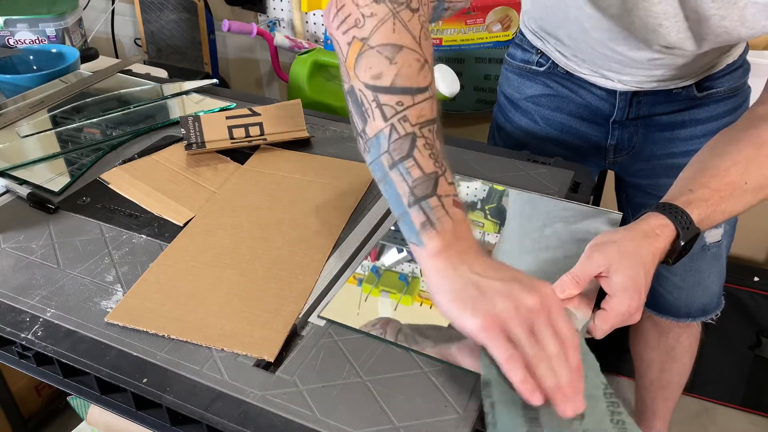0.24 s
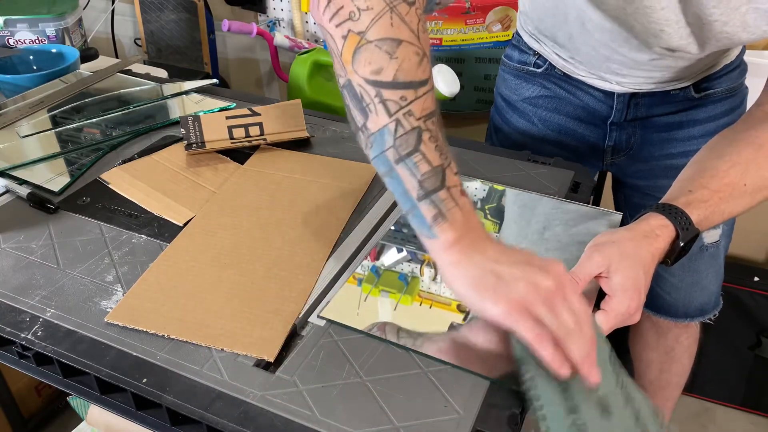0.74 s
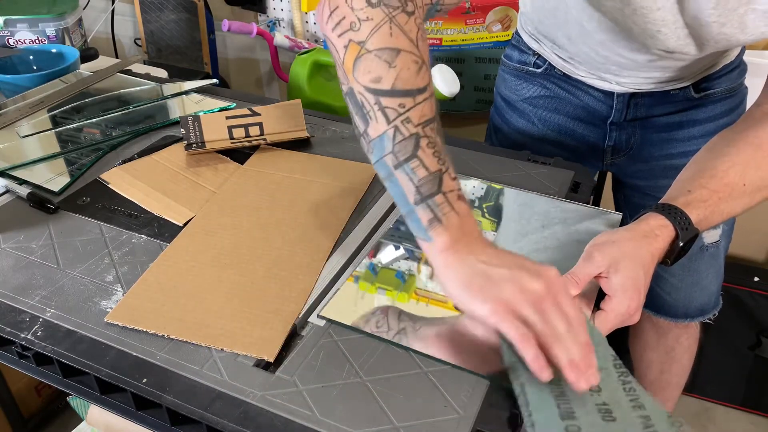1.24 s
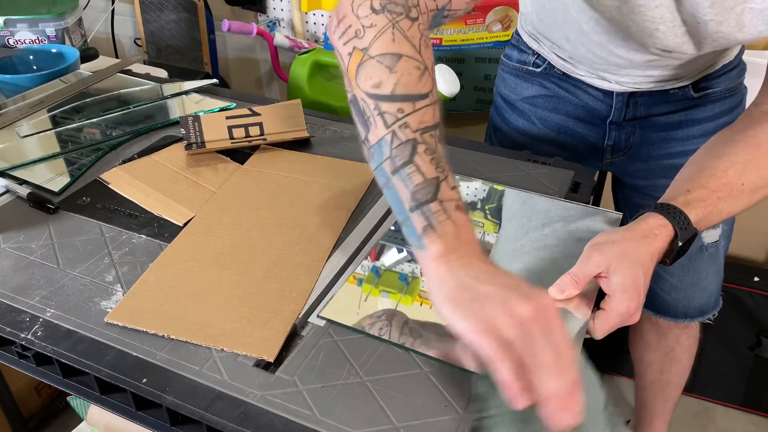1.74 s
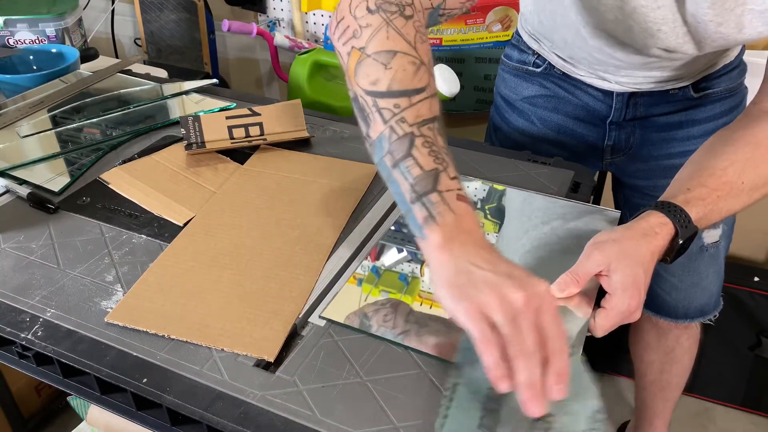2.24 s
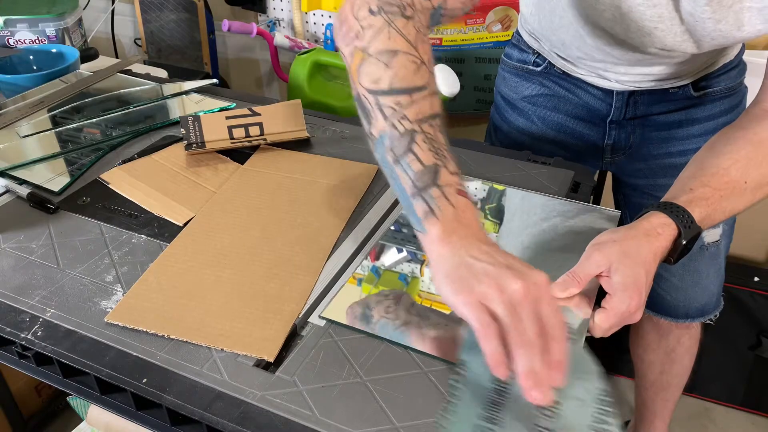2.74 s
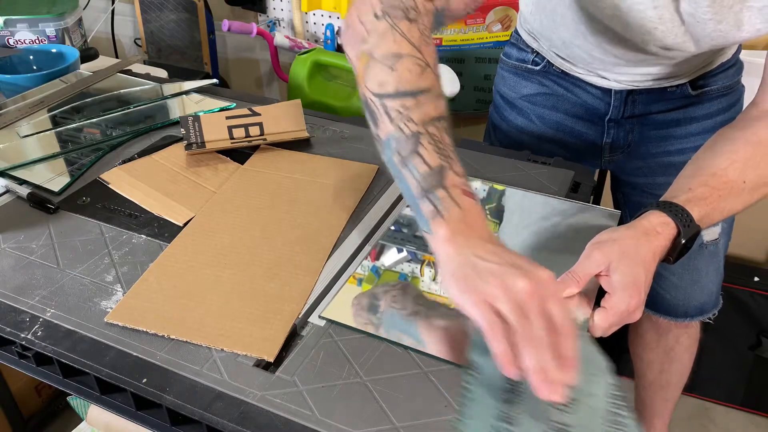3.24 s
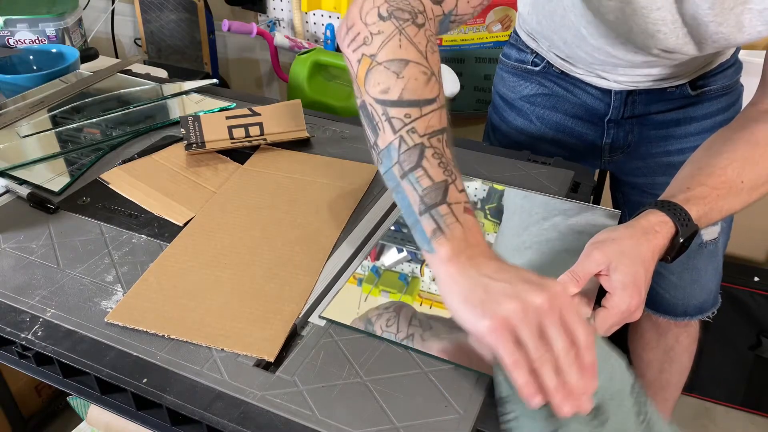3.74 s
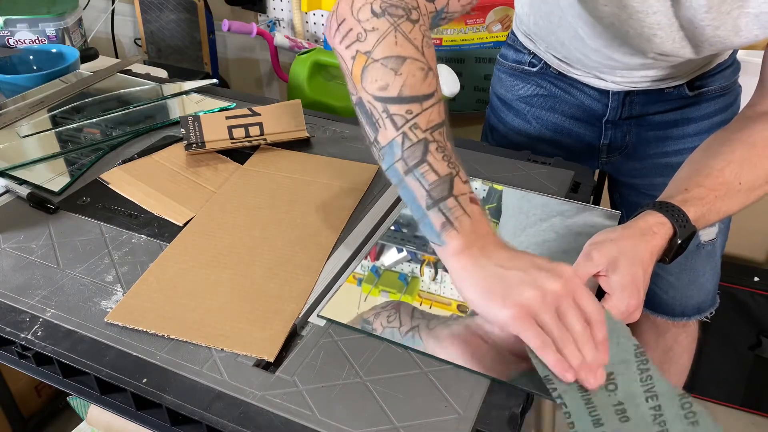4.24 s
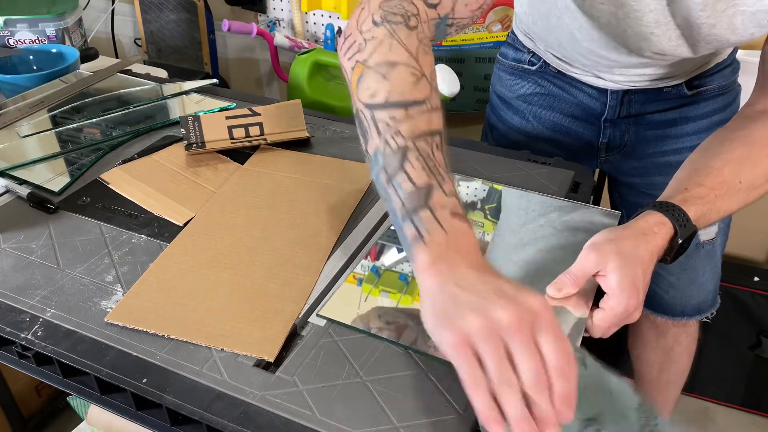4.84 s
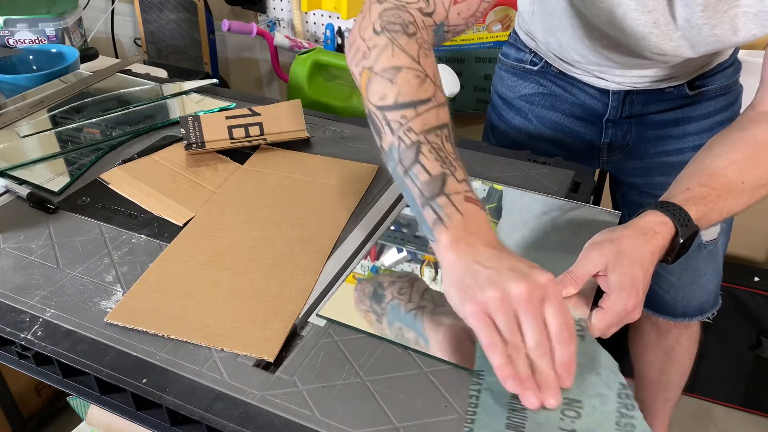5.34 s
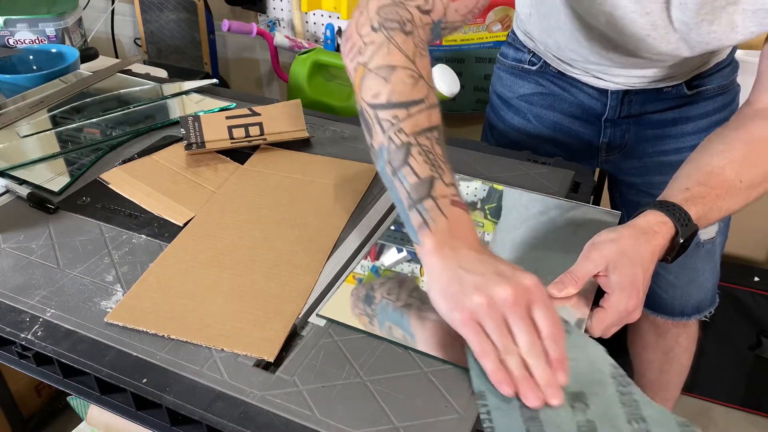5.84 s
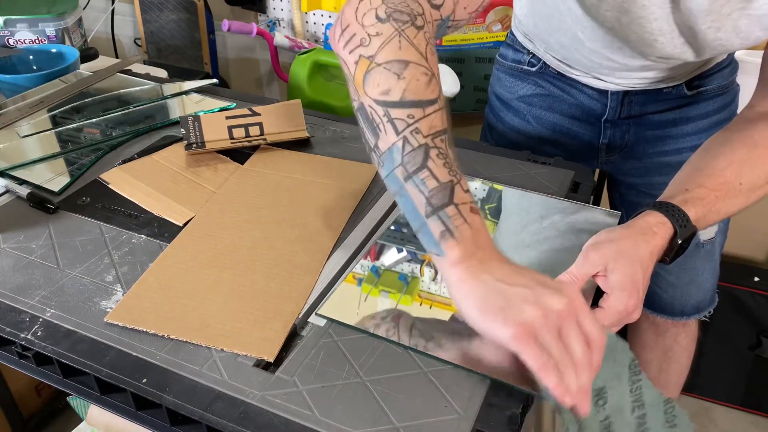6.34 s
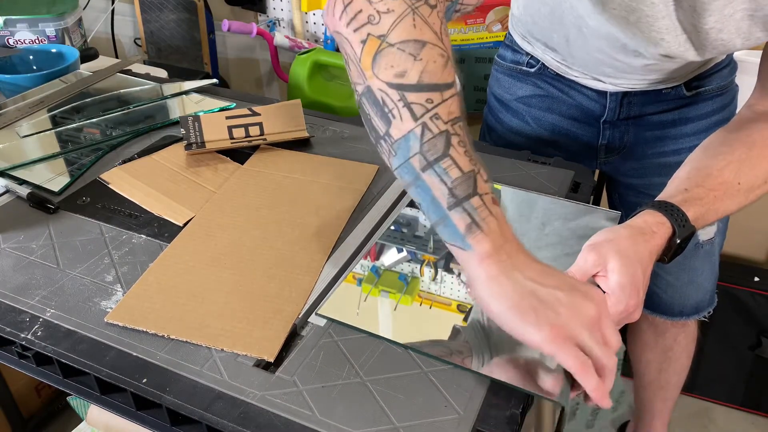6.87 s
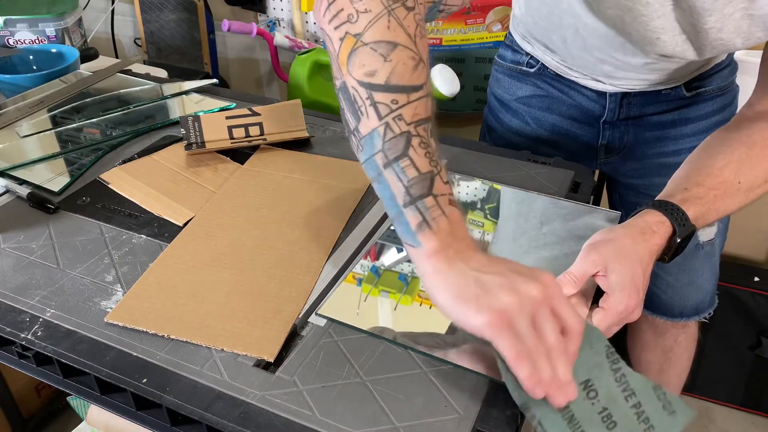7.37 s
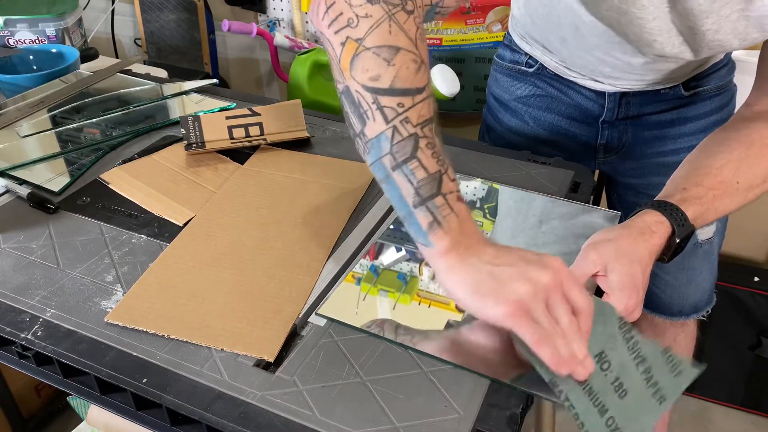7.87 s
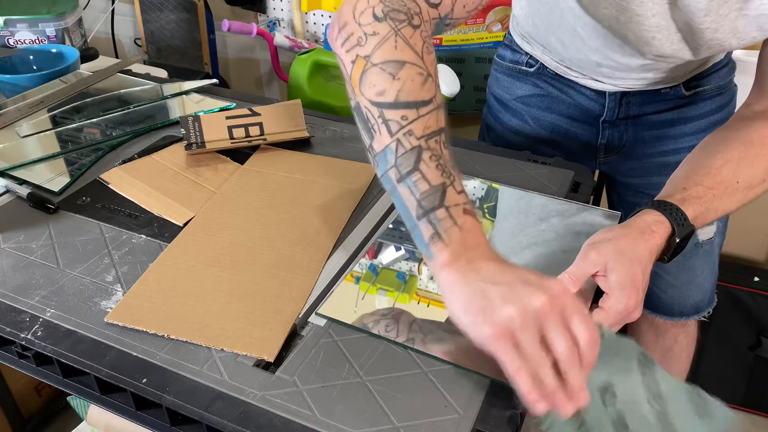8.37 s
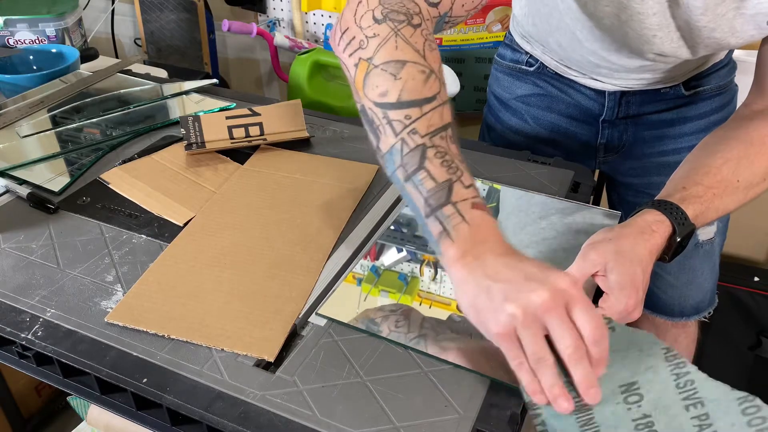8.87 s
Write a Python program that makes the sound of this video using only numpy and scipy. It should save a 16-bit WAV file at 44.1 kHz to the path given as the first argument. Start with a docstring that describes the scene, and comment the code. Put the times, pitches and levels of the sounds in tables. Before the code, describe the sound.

Sandpaper rasps in quick, gritty strokes along a glass edge, easing into a lighter, looser, squeaky spell before the firm, fast rubbing returns.

```python
"""Quick, gritty rasps follow one another, mostly eight to ten a second and slower in the middle, with some
squeaks, ticks, dull knocks and a short singing tone: sandpaper is rubbed by hand along a glass tile's edge.
The rasp is random grains and hiss, shaped stroke by stroke and filtered by the sheet and the tile.
Squeaks are narrow noise with a sliding pitch, knocks are decaying tones, snaps are tiny noise bursts.
A faint room tail and a dull background surround it all."""
import sys
import numpy as np
from scipy import signal
from scipy.fft import rfft, irfft, next_fast_len
from scipy.io import wavfile

SR = 44100
rng = np.random.default_rng(int(sys.argv[2]) if len(sys.argv) > 2 else 0)


def waveform_to_disk(signal):
    """Save audio, clipped to [-1, 1], as 16-bit WAV at the path in sys.argv[1]."""
    frames = np.transpose(np.atleast_2d(signal))
    scaled = np.clip(frames, -1, 1) * 32767
    samples = np.round(scaled).astype(np.int16)
    wavfile.write(sys.argv[1], SR, samples)


N = 401751

# Strokes of the hand. Each row: start of full bite in seconds, length in seconds, level in dB,
# brightness in dB (shared out by BRIGHTNESS_SHARE).
STROKES = [(0.004, 0.031, -20.5, 3), (0.087, 0.065, -18.5, 1), (0.185, 0.059, -19.5, 2),
           (0.294, 0.081, -17.5, -0.5), (0.402, 0.06, -16.5, -0.5), (0.508, 0.067, -15.5, -3),
           (0.601, 0.088, -21, -1), (0.726, 0.068, -15.5, 0), (0.825, 0.08, -17.5, -0.5),
           (0.955, 0.086, -19.5, 0), (1.084, 0.065, -20, 3), (1.199, 0.054, -16.5, 3),
           (1.292, 0.072, -17.5, 3), (1.402, 0.078, -17.5, 3), (1.517, 0.059, -21, 2.5),
           (1.631, 0.057, -19, -0.5), (1.721, 0.071, -19.0, -1.5), (1.833, 0.078, -18, -1.5),
           (1.947, 0.1, -21.5, 0.5), (2.179, 0.026, -31, -7.5), (2.282, 0.068, -37, -0.5),
           (2.442, 0.077, -35, 4), (2.597, 0.06, -30.5, -1.5), (2.748, 0.067, -26.5, 2.5),
           (2.911, 0.081, -26.5, 4.5), (3.08, 0.081, -32.5, 5.5), (3.249, 0.141, -39.5, 9),
           (3.438, 0.036, -37.5, -1.5), (3.531, 0.04, -34.5, 2), (3.611, 0.021, -32, -1.5),
           (3.676, 0.047, -27, -5), (3.791, 0.057, -30, 2.5), (3.894, 0.047, -27.5, 0),
           (4.022, 0.027, -21.0, -2), (4.099, 0.038, -22, 2), (4.24, 0.022, -22.5, 1),
           (4.321, 0.036, -24.5, 1.5), (4.443, 0.044, -21.5, -4), (4.551, 0.04, -24, 7.5),
           (4.671, 0.025, -22, 4), (4.749, 0.059, -30, -1), (4.849, 0.08, -51, -2.5),
           (5.268, 0.19, -25.5, 2), (5.538, 0.071, -23.5, 2.5), (5.671, 0.084, -18.5, 0),
           (5.815, 0.079, -23.0, 1.5), (5.957, 0.12, -20, 1), (6.277, 0.062, -20, 0.5),
           (6.377, 0.054, -17, 0.5), (6.475, 0.06, -17.0, -1.5), (6.57, 0.063, -18.5, -2),
           (6.671, 0.055, -20.5, -0.5), (6.768, 0.029, -23.5, 2.5), (6.865, 0.027, -22, 2.5),
           (6.937, 0.056, -19, -1.5), (7.03, 0.043, -20.5, 3), (7.129, 0.062, -20.5, 1),
           (7.23, 0.064, -22, 1), (7.343, 0.03, -22, 3), (7.427, 0.056, -20.5, 1.5),
           (7.52, 0.057, -21.5, 1), (7.625, 0.058, -19.5, 0), (7.716, 0.06, -19, -1),
           (7.83, 0.059, -19.5, 1.5), (7.929, 0.053, -20.0, 2.5), (8.038, 0.047, -18.5, 2),
           (8.123, 0.086, -21, 1.0), (8.256, 0.071, -20.5, -2), (8.367, 0.073, -18.5, 0.5),
           (8.503, 0.035, -21.5, -5), (8.582, 0.03, -24.5, -2), (8.681, 0.042, -17, 1),
           (8.771, 0.039, -20.5, 3.5), (8.873, 0.038, -16.5, 1), (8.969, 0.0073, -21.5, 1.5),
           (9.021, 0.085, -17.0, 0.5)]
# Centres of four bands in Hz: body, middle, upper middle and hiss.
BAND_HZ = [400, 1300, 3100, 5600]
# Single squeaks of the sheet on the edge. Each row: start in seconds, length in seconds, pitch in Hz, level in dB.
SQUEAKS = [(0.611, .013, 6100, -15.5), (1.407, 0.027, 4920, -16.5), (2.094, 0.065, 2100, -26.5),
           (2.095, 0.041, 3140, -26), (2.276, 0.052, 1830, -30.5), (2.28, 0.061, 5350, -33),
           (2.455, 0.056, 1270, -37), (2.609, 0.03, 1284, -39), (2.613, 0.015, 5500, -28),
           (2.924, 0.038, 5630, -25), (3.441, 0.052, 566, -45.5), (3.522, 0.066, 2010, -38),
           (3.524, 0.031, 419, -41.5), (5.167, .018, 1410, -35), (5.168, .024, 3350, -41),
           (5.972, 0.039, 6000, -24.5), (6.139, 0.028, 3580, -34.5)]
# The tile is pushed against the bench. Each row: start in seconds, level in dB,
# clack of the glass against the thud in dB (both before the trims in knocks).
KNOCKS = [(0.633, -30, 2), (0.783, -33, 0), (1.35, -29, -10), (1.43, -31, 3), (1.56, -34.5, -12),
          (1.894, -38, 4), (3.121, -33, 16), (3.453, -41, 5), (3.625, -44, 1), (3.825, -40.5, 1),
          (4.034, -31, -1.5), (4.16, -39.5, 16.5), (4.368, -35.5, 11), (5.124, -47, 14.5),
          (5.249, -33.5, 7), (5.805, -26, -7), (7.339, -35, -1), (8.451, -38.5, 8.5), (8.79, -39, 12),
          (8.97, -29.5, -2)]
# Tones of the bench thud. Each row: frequency in Hz, level in dB, time to fall 60 dB in seconds.
BENCH_TONES = [(191, -3, .08), (265.4, 2.5, 0.1), (356, -3, 0.12), (418.4, -1.5, 0.094)]
# Tones of the tile's clack. Each row: frequency in Hz, level in dB, time to fall 60 dB in seconds.
CLACK_TONES = [(447, -6.5, 0.015), (665, -3, 0.059), (920, -3, 0.035), (1000, 4, 0.027),
               (1128, -1.5, 0.069), (1380, -17.5, 0.054)]
# Coarse grains snap off. Each row: start in seconds, peak in dB before the trim in snaps.
SNAPS = [(.556, -7), (0.617, -13), (0.625, -14), (1.412, -9), (3.087, -19), (3.89, -17), (4.763, -12.5),
         (4.93, -54), (5.158, -33.5), (5.251, -20), (5.35, -13.5), (8.967, -9.5)]
# The broad voice of the sheet. Each row: frequency in Hz, relative gain in dB.
RASP_VOICE = [(30, -29), (130, -27.5), (240, -19.5), (450, -13.5), (760, -11.5), (950, -5.5), (1800, -5),
              (2800, 0), (3500, 1.5), (4250, -3.5), (5200, 2), (6000, -0.5), (7200, -4), (7700, -18)]
# Resonances of the held tile. Each row: frequency in Hz, width in Hz, lift in dB.
TILE_RESONANCES = [(241, 60, 3), (338, 42, 5.5), (516, 32, 5), (689, 48, 4), (1055, 80, 3), (2138, 90, 3),
                   (2860, 80, 2), (5480, 180, 2)]
# How the room dies away. Each row: frequency in Hz, time to fall 60 dB in seconds.
ROOM_DECAY = [(150, .3), (1000, .32), (4000, .35), (8000, .35)]
# Colour of the background. Each row: frequency in Hz, relative gain in dB.
BACKGROUND = [(30, 0.5), (120, -8.5), (500, -17), (2000, -29), (8000, -30.5)]
# How freely the sheet hangs. Each row: time in seconds, looseness from 0 (pressed flat) to 1 (loose).
LOOSENESS = [(2.0, 0.054), (2.15, 0.99), (3.3, 0.46), (3.6, 0.98), (4.8, 1), (5.3, .15), (6.0, 0.19),
             (6.14, 1), (6.27, .05)]
# Broad resonances of the loose sheet. Each row: frequency in Hz, width in Hz, lift in dB when fully loose.
SHEET_RESONANCES = [(1000, 1300, 2.5), (3240, 400, 2), (3460, 630, 0.5), (4200, 170, 2), (5000, 3600, 10),
                    (7100, 760, 11)]
# How hard the rubbing makes one tile tone sing. Each row: time in seconds,
# level against the rasp in dB before the trim in singing.
SINGING_LEVEL = [(0, -35), (1.0, -17.5), (1.9, -18.5), (2.3, -30.5), (6.2, -31), (6.6, -11.5), (6.87, -2),
                 (7.15, -9), (7.4, -36), (9.1, -14)]
# The sheet snags and tears free. Each row: time in seconds, fall in seconds (20 dB down), level in dB,
# fullness in dB (shared out by FULLNESS_SHARE).
CATCHES = [(.28, .02, -28, -2.5), (0.615, .062, -14.5, -7.5), (.768, 0.023, -16.5, -4),
           (1.402, .054, -15.5, -9), (2.098, 0.063, -18.5, 6.5), (3.118, 0.035, -21.5, 5.5),
           (3.825, 0.023, -22.5, 2), (3.888, 0.016, -24.5, -2.5), (4.028, 0.026, -23, 6),
           (4.764, 0.066, -13.5, -9), (5.166, .033, -33.5, 25), (5.256, .029, -21.5, 1),
           (5.405, .061, -22, 2), (5.802, .03, -29, 12), (6.138, 0.043, -31, 13.5),
           (6.259, 0.046, -21.5, -2.5), (6.844, 0.025, -24, 2), (8.135, .025, -19, -4.5),
           (8.492, 0.046, -21.5, 5.5), (8.656, 0.048, -22.5, 4), (8.966, 0.038, -28.5, 1)]
# Share of a snag's fullness in each of the four bands [no unit].
FULLNESS_SHARE = [1, .7, 0, -0.16]
# The colour drifts as the sheet shifts under the fingers. Each row: time in seconds,
# body in dB, middle in dB, hiss in dB, all against the upper middle.
COLOUR_DRIFT = [(0.099, -2, 2.5, -1.5), (0.701, 4, 5.5, 3), (1.298, 1.5, 3.5, -4), (1.799, 0, 2.5, 1),
                (2.022, 3.5, 2.5, 0), (2.18, 9, 10, 7.5), (2.5, 0, 2, 3), (2.949, 0.5, 2, -2.5),
                (3.4, -2.5, 5.5, 0.5), (3.55, 4, 0, 6.5), (3.63, -1, 0.5, -3.5), (3.92, -2.5, -1.5, -14),
                (4.101, 0, 0.5, -4), (4.601, -1, 1.5, -9), (5.3, 2.5, 6, 2), (5.7, 1, 7.5, 1),
                (6.048, 1, 0.5, -7), (6.499, 3, 3.5, 1), (7.05, 5.5, 7.5, 2), (7.3, -2, -0.5, -7),
                (7.75, 2, 3.5, 2.5), (8.15, 0, 3, -2.5), (8.499, -5, 2, -3.5), (9.001, 5, 7.5, -0.5)]
# Change in each of the four bands for one dB of harder rubbing [dB per dB].
HARDER_BRIGHTER = [-0.5, -0.27, 0, 0.49]
# Share of a stroke's brightness in each of the four bands [no unit].
BRIGHTNESS_SHARE = [-0.27, -1.1, -0.68, 0.44]

EDGE_HZ = 7900  # the sound falls off steeply above this
FIRM_DB = -20  # level of an ordinary firm stroke
RISE_S, FALL_S = 0.025, 0.025  # a firm stroke rises and falls over 20 dB in these times
GENTLE = .34  # how much more slowly lighter strokes start and stop: a power of their strength
ARCH_DB = 2.5  # the middle of a stroke is louder than its ends by this much
FALL_CURVE = 1.05  # 1 would be a straight fall in dB
RUSTLE_DB, RUSTLE_T60_S = -15.5, 0.15  # a loose sheet rustles on after a stroke: its level and decay
PRESSED_DB = -14  # added to the rustle when the sheet is pressed flat
SING_HZ, SING_WIDTH_HZ = 2130, 105  # middle pitch and width of the singing tone
SNAP_DECAY_S = .0005  # noise in a snap falls to about a third in this time
SQUEAKY_FROM_S, SQUEAKY_TO_S = 3.58, 4.72  # every stroke starting between these times squeaks
SQUEAK_HZ = 2884  # average pitch of those squeaks


def amp(db):
    """Turns dB into a plain multiplier."""
    return 10 ** (np.asarray(db) / 20)


def unit(x):
    """Scales a sound to an RMS level of 1."""
    return x / np.sqrt(np.mean(x ** 2) + 1e-20)


def read(points, hz):
    """Draws straight lines between points on a log-frequency axis."""
    f, value = np.transpose(points)
    return np.interp(np.log(hz + 1), np.log(f + 1), value)


def at_time(points, s):
    """Draws straight lines between points in time."""
    return np.interp(s, *np.transpose(points))


def resonance(hz, centre_hz, width_hz, lift_db):
    """A resonance lifts the frequencies around its centre: the lift in dB."""
    return lift_db / (1 + (2 * (hz - centre_hz) / width_hz) ** 2)


def add(mix, s, sound):
    """Mixes a sound in at time s, trimming what lies outside the mix."""
    start = round(s * SR)
    sound, part = sound[max(-start, 0):], mix[max(start, 0):]
    part[:len(sound)] += sound[:len(part)]


def wander(x, step):
    """A random curve along x, made of straight lines to a new value every step."""
    knots = rng.standard_normal(4096)
    return np.interp((x - x[0]) / step % 4095, np.arange(4096), knots)


def coloured(x, colour_db):
    """Filters a sound by a gain in dB over frequency, without sounding ahead of its cause."""
    size = 8192
    hz = abs(np.fft.fftfreq(size, 1 / SR))
    log_gain = np.log(amp(colour_db(hz)))
    minimum_phase = np.exp(np.conj(signal.hilbert(log_gain)))
    taps = np.fft.ifft(minimum_phase).real[:size // 2]
    return signal.oaconvolve(x, taps / np.linalg.norm(taps))[:len(x)]


def still_air(level_db=-84):
    """The faint, dull background of the room is filtered noise."""
    return amp(level_db) * coloured(rng.standard_normal(N), lambda hz: read(BACKGROUND, hz))


def sheet_and_tile(hz):
    """The paper has a broad voice, and the glass adds narrow resonances: the gain in dB."""
    lifts = sum(resonance(hz, *row) for row in TILE_RESONANCES)
    return read(RASP_VOICE, hz) + lifts - np.clip((hz - EDGE_HZ) / 20, 0, 40)


def grit(per_s=7000, spread_db=2.5, dust_db=0, judder_db=1.74, loose_judder_db=2.0, judder_s=0.0055):
    """Thousands of grains catch and let go amid hissing dust; a loose sheet judders more."""
    t = np.arange(N) / SR
    sizes = amp(spread_db * np.minimum(rng.exponential(1, N), 5)) * rng.choice([-1, 1], N)
    grains = unit(sizes * (rng.random(N) < per_s / SR))
    dust = amp(dust_db) * rng.standard_normal(N)
    depth_db = judder_db + loose_judder_db * at_time(LOOSENESS, t)
    return unit((grains + dust) * amp(depth_db * wander(t, judder_s)))


def grip(hz, colour_db, loose, flat_db=1.5, loose_db=2.8, drift=0.032, ripple_db=3.0):
    """Each placing of the fingers colours the rasp; a loose sheet rings more, and more unevenly."""
    lifts = 0
    for centre_hz, width_hz, lift_db in SHEET_RESONANCES:
        moved_hz = centre_hz * (1 + drift * rng.standard_normal())
        lifts = lifts + resonance(hz, moved_hz, width_hz, lift_db)
    folds = (flat_db + loose_db * loose) * wander(hz, 300)
    ripple = ripple_db * wander(hz, 60)  # reflections from the moving hand and the bench comb the sound
    gain = amp(read(list(zip(BAND_HZ, colour_db)), hz) + loose * lifts + folds + ripple)
    # Keep the rasp's overall level the same whatever the colour.
    return gain / np.sqrt(np.average(gain ** 2, weights=amp(sheet_and_tile(hz)) ** 2))


def rub(grains, s, length, shape, colour_db, swing_db=1.45):
    """Grit follows a level shape in dB, and its colour shifts as the sheet slides over the edge."""
    a = max(int((s - .12) * SR), 0)
    b = min(int((s + length + .18) * SR), N)
    t = np.arange(a, b) / SR - s
    size = next_fast_len(b - a)
    hz, loose = np.fft.rfftfreq(size, 1 / SR), at_time(LOOSENESS, s)
    times, *bands = np.transpose(COLOUR_DRIFT)
    body, middle, hiss = [np.interp(s + length / 2, times, band) for band in bands]
    colour_db = colour_db + [body, middle, 0, hiss]
    # One half of the stroke is brighter than the other.
    swing = np.multiply(BRIGHTNESS_SHARE, swing_db * rng.standard_normal())
    grips = np.array([grip(hz, colour_db + side * swing, loose) for side in (-1, 1)])
    early, late = irfft(rfft(grains[a:b], size) * grips, size)[:, :b - a]
    travel = np.clip(.5 + (t - length / 2) / .02, 0, 1)  # crossfade in mid-stroke
    return a / SR, (early + travel * (late - early)) * amp(shape(t))


def stroke_shape(t, length, db, loose, bite_curve=1.22, loose_bite=0.22):
    """The hand speeds up, arches and slows down, then the sheet rustles: the level in dB."""
    slow = amp(GENTLE * min(FIRM_DB - db, 14))
    before, after = np.maximum(-t, 0), np.maximum(t - length, 0)
    rise_db = -20 * (before / (RISE_S * slow)) ** (bite_curve - loose_bite * loose)
    fall_db = -20 * (after / (FALL_S * slow)) ** FALL_CURVE
    rustle_db = RUSTLE_DB + PRESSED_DB * (1 - loose) - 60 * after / RUSTLE_T60_S
    arch_db = -ARCH_DB * np.clip(2 * t / length - 1, -1, 1) ** 2
    return db + rise_db + np.maximum(fall_db, rustle_db) + arch_db


def strokes():
    """The hand goes to and fro, dragging grit over the edge; harder strokes are brisker and brighter."""
    grains, out = grit(), np.zeros(N)
    for s, length, db, bright_db in STROKES:
        loose = at_time(LOOSENESS, s)
        colour_db = np.multiply(HARDER_BRIGHTER, db - FIRM_DB) + np.multiply(BRIGHTNESS_SHARE, bright_db)
        shape = lambda t: stroke_shape(t, length, db, loose)
        add(out, *rub(grains, s, length, shape, colour_db))
    return coloured(out, sheet_and_tile)


def singing(rasp, level_db=-3, flare_db=3.0, bend_hz=36):
    """The rasp pumps one narrow tone of the glass; the shifting hand bends its pitch and lets it flare."""
    t = np.arange(N) / SR
    pitch_hz = SING_HZ + bend_hz * wander(t, .04)
    turn = np.exp(2j * np.pi * np.cumsum(pitch_hz) / SR)
    # Shift the tone down to zero frequency, smooth it there, then shift it back.
    keep = np.exp(-np.pi * SING_WIDTH_HZ / SR)
    tone = (turn * signal.lfilter([1 - keep], [1, -keep], rasp / turn)).real
    flare = flare_db * wander(t, .035)
    return unit(tone) * rasp.std() * amp(level_db + flare + at_time(SINGING_LEVEL, t))


def catches(attack_s=0.0056):
    """A snagged sheet tears free all at once and the scrape dies away."""
    grains, out = grit(), np.zeros(N)
    for s, fall, db, full_db in CATCHES:
        # The attack rises 20 dB in attack_s; the fall gets steeper as it goes.
        shape = lambda t: db - 20 * np.maximum(-t / attack_s, 0) - 20 * np.maximum(t / fall, 0) ** 2
        add(out, *rub(grains, s, fall, shape, np.multiply(FULLNESS_SHARE, full_db)))
    return coloured(out, sheet_and_tile)


def snaps(centre_hz=5400, level_db=3):
    """A coarse grain breaks with a bright tick about a millisecond long."""
    out, t = np.zeros(N), np.arange(SR // 100) / SR
    band = signal.butter(2, [centre_hz * .6, centre_hz * 1.3], "band", fs=SR, output="sos")
    for s, db in SNAPS:
        tick = signal.sosfilt(band, rng.standard_normal(len(t)) * np.exp(-t / SNAP_DECAY_S))
        add(out, s, amp(db + level_db) * tick / abs(tick).max())
    return out


def squeak(length, pitch_hz, glide=0.036, width_share=0.13):
    """The sheet sticks and slips near one pitch: a short, rough squeak that slides up and fades."""
    size = 8192
    band = 1 / (1 + (2 * np.fft.fftfreq(size, 1 / SR) / (width_share * pitch_hz)) ** 2)
    noise = rng.standard_normal(size) + 1j * rng.standard_normal(size)
    slips = np.fft.ifft(band * noise)[:int(length * SR)]
    along = np.linspace(0, 1, len(slips))
    turn = np.exp(2j * np.pi * np.cumsum(pitch_hz * (1 + glide * (along - .5))) / SR)
    fade = np.interp(along, [0, .1, .6, 1], [0, 1, 1, 0])
    return unit((slips * turn).real * fade)


def chatter(squeak_db=-3, octave_db=0, octave_growth=1.2, lead_s=0.0092, extra_s=0.0189,
            scatter=0.044, glide=0.1284, width_share=0.14):
    """The sheet squeaks singly, then on every stroke of one loose spell; harder strokes bring out the octave."""
    out = np.zeros(N)
    for s, length, pitch_hz, db in SQUEAKS:
        add(out, s, amp(db) * squeak(length, pitch_hz))
    for s, length, db, _ in STROKES:
        if SQUEAKY_FROM_S < s < SQUEAKY_TO_S:
            pitch_hz = SQUEAK_HZ * (1 + scatter * rng.standard_normal())
            first = squeak(length + extra_s, pitch_hz, glide, width_share)
            octave_gain = amp(octave_db + octave_growth * (db - FIRM_DB))
            octave = octave_gain * squeak(length + extra_s, 2 * pitch_hz)
            add(out, s - lead_s, amp(db + squeak_db) * (first + octave))
    return out


def ring(tones, t, scatter=0.061, push_s=0.0086):
    """Struck tones die away, detuned a little by the hand that holds the tile; the peak is 1."""
    sound = np.zeros(len(t))
    for hz, db, t60 in tones:
        detuned_hz = hz * (1 + scatter * rng.standard_normal())
        sound += amp(db - 60 * t / t60) * np.sin(2 * np.pi * (detuned_hz * t + rng.random()))
    sound *= 1 - np.exp(-t / push_s)  # a push starts softly
    return sound / abs(sound).max()


def knocks(thud_db=-1, glass_db=-3, scuff_db=-1, scuff_s=0.017):
    """The bench thuds, the tile clacks on it and skids a little."""
    out, t = np.zeros(N), np.arange(SR // 5) / SR
    dull = signal.butter(2, [350, 1400], "band", fs=SR, output="sos")
    for s, db, clack_db in KNOCKS:
        skid = signal.sosfilt(dull, rng.standard_normal(len(t)) * np.exp(-t / scuff_s))
        glass = amp(glass_db) * ring(CLACK_TONES, t) + amp(scuff_db) * skid / abs(skid).max()
        thud = amp(thud_db) * ring(BENCH_TONES, t)
        add(out, s, amp(db) * (thud + amp(clack_db) * glass))
    return out


def workshop(x, tail_db=-22):
    """A small workshop answers with a faint tail of dense reflections, each band dying at its own speed."""
    t = np.arange(SR // 2) / SR
    noise = rng.standard_normal(len(t)) * (t > .004)
    hz, at, z = signal.stft(noise, SR, nperseg=256)
    decay = amp(-60 * at / read(ROOM_DECAY, hz)[:, None])
    tail = signal.istft(z * decay, SR, nperseg=256)[1][:len(t)]
    return x + amp(tail_db) * signal.oaconvolve(x, tail / np.linalg.norm(tail))[:N]


def scene():
    """All sources sound at the tile, close to the microphone, and the room answers."""
    rasp = strokes() + catches()
    at_tile = rasp + singing(rasp) + chatter() + knocks() + snaps()
    return (workshop(at_tile) + still_air())[None]


def record(dry):
    """A narrow-band microphone channel rounds off the highest peaks and cuts the top treble."""
    rounded = dry / (1 + (dry / .85) ** 8) ** (1 / 8)
    lowpass = signal.firwin(201, EDGE_HZ, window=("kaiser", 8), fs=SR)
    return signal.oaconvolve(rounded, lowpass[None], "same")


dry = scene()
out = record(dry)
waveform_to_disk(out)
```